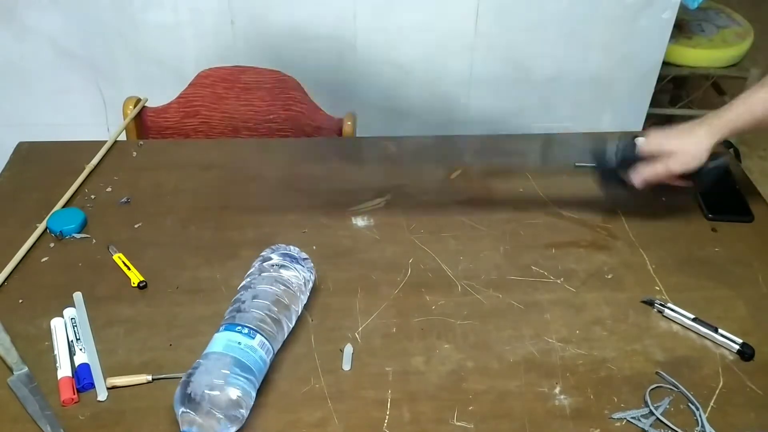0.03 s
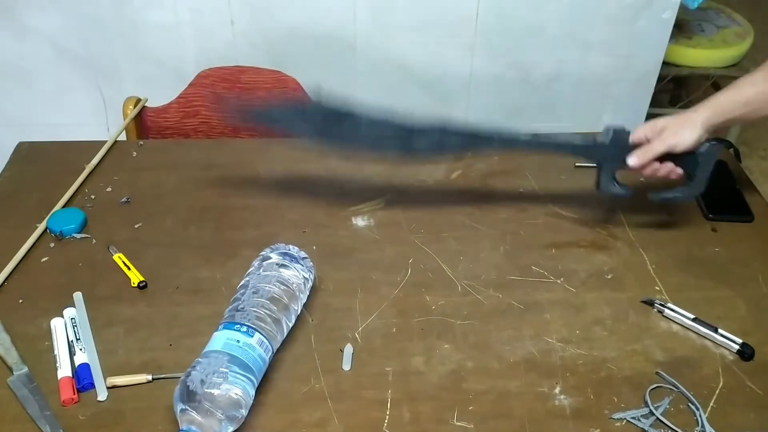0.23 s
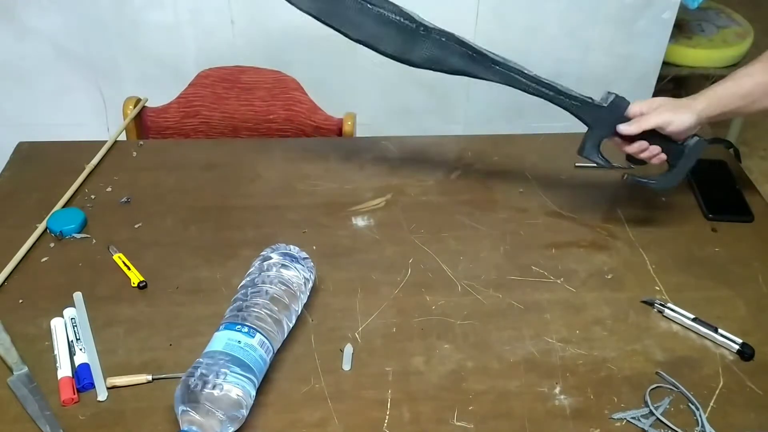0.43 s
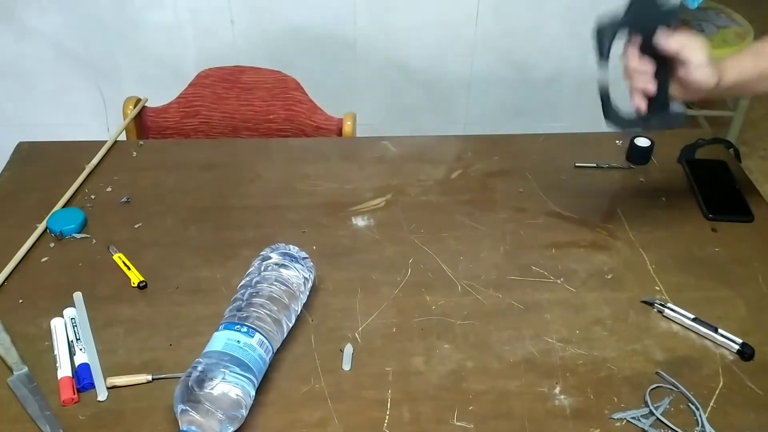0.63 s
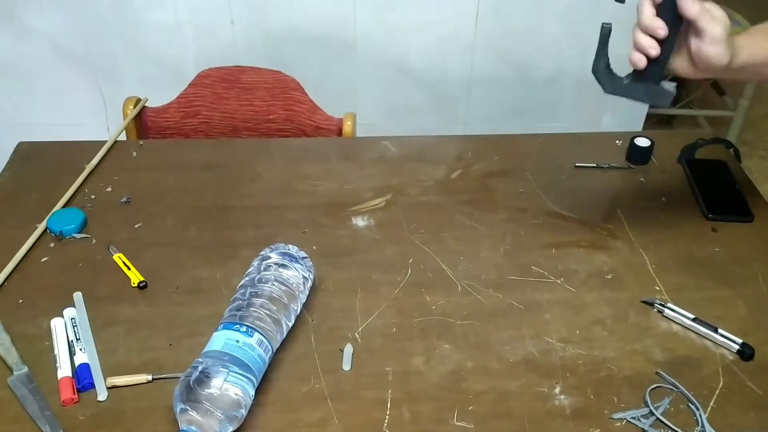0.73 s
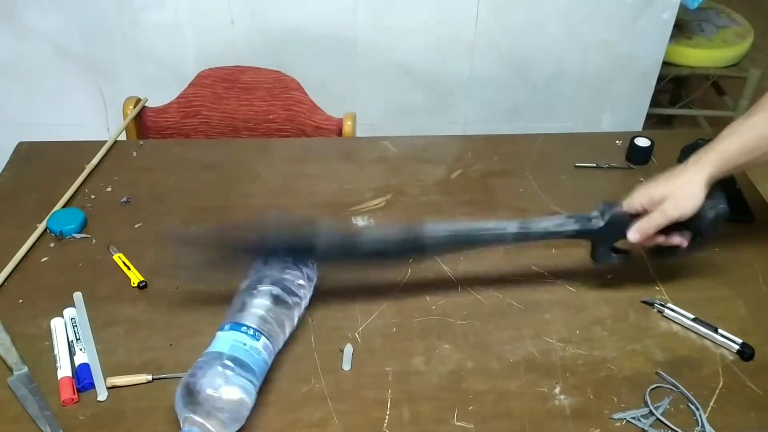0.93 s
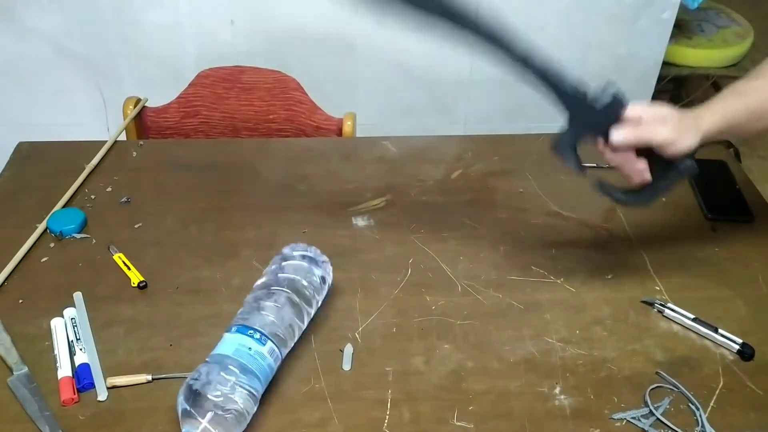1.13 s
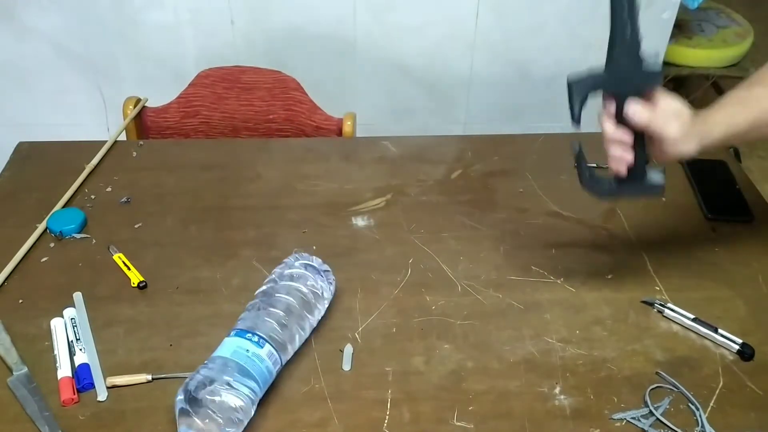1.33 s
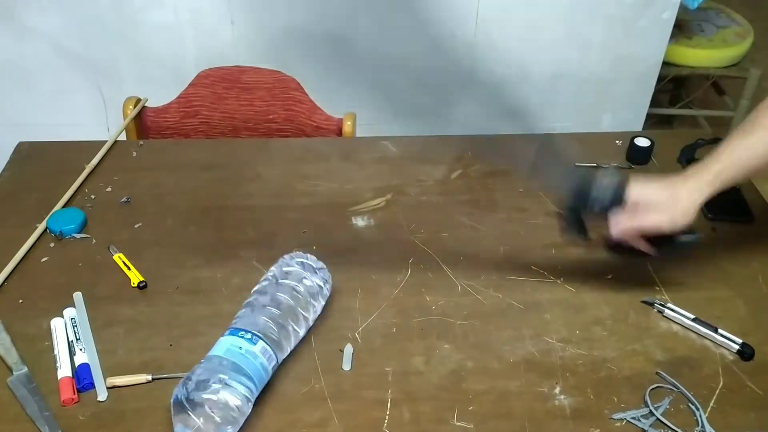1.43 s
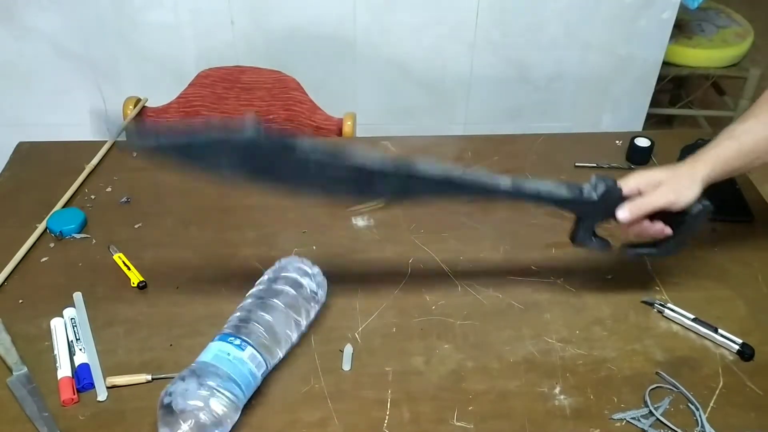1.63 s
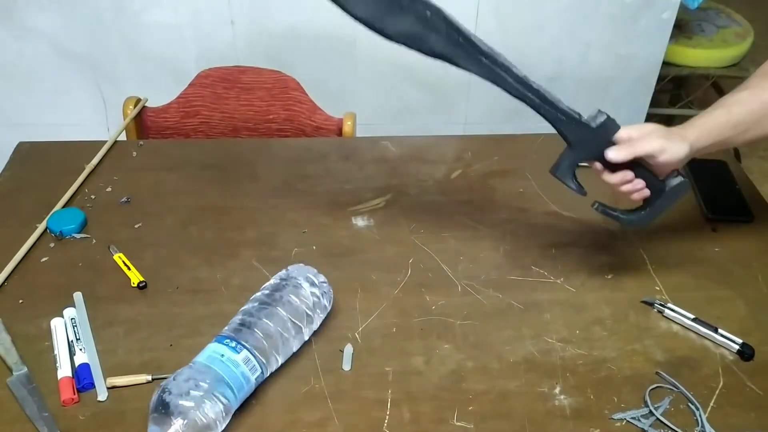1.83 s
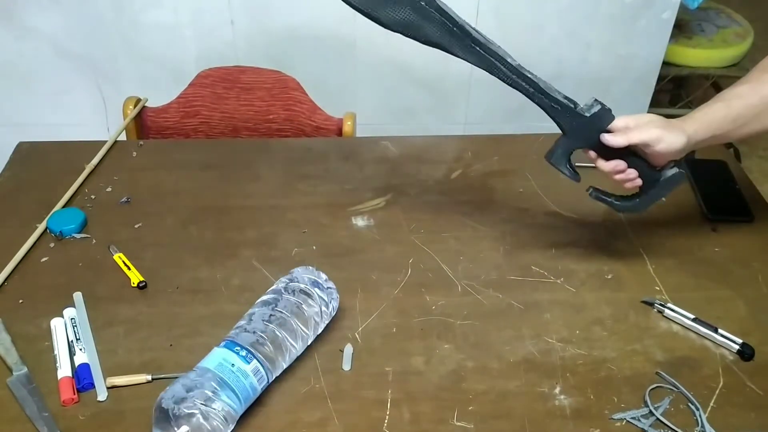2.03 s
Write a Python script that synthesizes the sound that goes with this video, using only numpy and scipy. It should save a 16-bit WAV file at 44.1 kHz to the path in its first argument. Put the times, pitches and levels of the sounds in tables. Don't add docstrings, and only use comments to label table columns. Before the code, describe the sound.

A foam sword slaps a wooden table at 0.2 s, a sharp clap with a woody boom and faint ringing of loose things. At 1.07 s it smacks a full plastic bottle, which thuds down, knocks around 1.25 s, crackles and rocks with rustling water. A soft swish leads to a harder double-touch hit at 1.62 s, knocks at 1.78 s, then fading rocking. Bare echoing room, loud blows squashed by a phone.

```python
import sys
import numpy as np
from scipy import signal
from scipy.fft import rfft, irfft, next_fast_len
from scipy.io import wavfile
from scipy.ndimage import uniform_filter1d, minimum_filter1d

SR = 44100
rng = np.random.default_rng(int(sys.argv[2]) if len(sys.argv) > 2 else 0)


def volts_from_db(level):
    exponent = np.asarray(level, float) / 20
    return 10 ** exponent


def wav_out(sig):
    wavfile.write(sys.argv[1], SR, np.round(np.clip(np.atleast_2d(sig).T, -1, 1) * 32767).astype(np.int16))


N = 92610

# (time [s], boom level [dB], slap level [dB])
TABLE_BLOWS = [
    (.2091, 5, 5),
]
# (frequency [Hz], level [dB], time to fall 60 dB [s])
THUMPED = [(60, 7, 0.42), (133, -0.5, 0.067), (149, 8.5, 0.25), (199.8, -1, 0.21), (256, 3, 0.1),
           (321, 1, 0.16), (383.3, 3.5, 0.064), (482, -7.5, 0.28), (508.2, 1, 0.24), (655.5, -4.5, 0.15),
           (743, 1, 0.24), (821, -6.5, 0.086), (1242, 2.5, 0.13), (1666, -3.5, 0.041)]
SLAP_S = .006
BLOW_WET_DB = 12.5


def unit(x):
    return x / np.sqrt(np.mean(x ** 2) + 1e-20)


def along(points, hz):
    f, v = np.transpose(points)
    return np.interp(np.log(hz + 1), np.log(f + 1), v)


def filtered(x, response):
    size = next_fast_len(x.shape[-1] + 8192)
    spectrum = rfft(x, size) * response(np.fft.rfftfreq(size, 1 / SR))
    return irfft(spectrum, size)[..., :x.shape[-1]]


def coloured_noise(colour):
    return filtered(rng.standard_normal((2, N)), lambda hz: volts_from_db(along(colour, hz)))


def pair(x):
    # (frequency [Hz], likeness [-1 to 1])
    alike = [(60, 0.98), (180, 0.98), (550, 0.71), (1650, 0.01), (4970, -0.094), (15000, 0.16)]

    def split(hz):
        turn = np.arccos(np.clip(along(alike, hz), -1, 1)) / 2
        return np.array([np.cos(turn), np.sin(turn)])

    mid, side = filtered(x, split)
    return np.array([mid + side, mid - side])


def add(out, x, s):
    at = round(s * SR)
    out[:, at:at + x.shape[1]] += x[:, :N - at]


def room(x, wet_db):
    # (frequency [Hz], time to fall 60 dB [s])
    fade_times = [(60, 0.63), (200, .55), (600, 0.51), (1500, 0.5), (4000, .45), (9000, 0.42),
                  (15000, 0.21)]
    gap_s, fill_s = 0.00098, 0.0021
    size = SR * 3 // 4
    hz, t, z = signal.stft(rng.standard_normal((2, size)), SR, nperseg=256)
    fade = volts_from_db(-60 * t / along(fade_times, hz)[:, None])
    tail = signal.istft(z * fade, SR, nperseg=256)[1][:, :size]
    since_wall = np.clip(np.arange(size) / SR - gap_s, 0, 1)
    tail = pair(tail) * (1 - np.exp(-since_wall / fill_s))
    return signal.fftconvolve(x[None], tail * volts_from_db(wet_db) / np.linalg.norm(tail[0]), axes=1)


def ring(modes, scatter_db, seconds=.5, longest_s=9):
    press_s = .0015
    t = np.arange(round(SR * seconds)) / SR
    out = np.zeros(len(t))
    for hz, db, t60 in modes:
        fade = volts_from_db(db + scatter_db * rng.standard_normal() - 60 * t / min(t60, longest_s))
        out += fade * np.sin(2 * np.pi * (hz * t + rng.random()))
    return (1 - np.exp(-t / press_s)) * out


def pulse(spectrum):
    size = 2048
    level = volts_from_db(along(spectrum, np.fft.rfftfreq(size, 1 / SR)))
    ceps = irfft(np.log(level + 1e-6))
    ceps[1:size // 2] *= 2
    ceps[size // 2 + 1:] = 0
    out = irfft(np.exp(rfft(ceps)))
    return out / np.linalg.norm(out)


def noise_puff(size, t60):
    puff = rng.standard_normal((2, size)) * volts_from_db(-60 * np.arange(size) / SR / t60)
    return puff / np.linalg.norm(puff[0])


def contacts(rows, modes, spectrum, t60, scatter_db, wet_db):
    wood_wet_db = 4
    out, push = np.zeros((2, N)), pulse(spectrum)
    for s, boom_db, noise_db in rows:
        wood = volts_from_db(boom_db - 30) * ring(modes, scatter_db, longest_s=.16)
        noise = signal.fftconvolve(noise_puff(512, t60), push[None], axes=1)
        add(out, volts_from_db(noise_db) * noise, s)
        add(out, wood[None], s)
        long_push = np.pad(push, (0, len(wood) - len(push)))
        sent = volts_from_db(wood_wet_db) * wood + volts_from_db(noise_db + wet_db) * long_push
        add(out, room(sent, 0), s)
    return out


def room_tone():
    # (frequency [Hz], level [dB])
    hush = [(15, -59), (25, -21), (59, 3), (102, -14.5), (195, -13), (911, -25.5), (1290, -29.5),
            (2280, -30.5), (16000, -35)]
    return volts_from_db(-58.5) * unit(pair(coloured_noise(hush)))


def swishes():
    # (time [s], level [dB], width [s])
    moves = [
        (.62, -57, 0.045),
        (.775, -61, .02),
        (1.065, -58, 0.035),
        (1.61, -43, 0.018),
    ]
    # (frequency [Hz], level [dB per Hz])
    air = [(500, 6), (3000, -7), (9000, -6.5), (15000, -13)]
    t = np.arange(N) / SR
    swell = sum(volts_from_db(db) * np.exp(-((t - s) / width) ** 2) for s, db, width in moves)
    return swell * unit(coloured_noise(air))


def loose():
    # (frequency [Hz], level [dB], time to fall 60 dB [s])
    singing = [(193.3, -49.5, 2.5), (201.5, -56.5, 6.5), (912, -51, 1.6), (1100, -57, .7)]
    out = np.zeros((2, N))
    add(out, ring(singing, 0, seconds=2)[None], TABLE_BLOWS[0][0])
    return out


def rocking():
    # (time [s], rumble level [dB], rustle level against the rumble [dB])
    stretches = [
        [(0.0, -38, -5.5), (0.104, -36.5, -20), (0.12, -41.5, -15.5), (0.17, -36.5, -19)],
        [(1.3, -29.5, -18), (1.442, -37.5, -11.5), (1.58, -39, -15.5)],
        [(1.86, -36.5, -3.5), (1.99, -44, -10.5), (2.016, -33.5, -16), (2.1, -42, -3.5)],
    ]
    # (frequency [Hz], width [Hz], level [dB])
    rocked = [(60, 35, 7), (155.8, 15.7, 5), (208.5, 30, 5.5), (254, 37, 7), (375, 50, -4), (490, 37, 4),
              (660, 40, -9), (722, 30, -5.5), (1168, 180, -7), (1800, 570, -16.5)]
    # (frequency [Hz], level [dB])
    rustle = [(880, -2.5), (1500, -2), (4460, -13.5), (11700, -15.5), (14900, -19), (16000, -36)]
    bumps_per_s, scatter_db, fade_s, wet_db = 220, 3, 0.066, 15.5

    def table(f):
        total = 0
        for k, (centre, width, db) in enumerate(rocked):
            drag = 1j * f * width
            total = total + (-1) ** k * volts_from_db(db) * drag / (centre * centre - f * f + drag)
        return total

    t = np.arange(N) / SR
    draw = rng.random((2, N + SR // 2))
    bumps = (draw[0] < bumps_per_s / SR) * volts_from_db(-scatter_db * np.log(draw[1] + 1e-9))
    near = filtered(bumps, table)
    rumble = unit((near + room(near, wet_db)[:, :len(near)])[:, -N:])
    hiss = unit(coloured_noise(rustle))
    out = np.zeros((2, N))
    for rows in stretches:
        s, db, under_db = np.transpose(rows)
        fade_in = np.clip((t - s[0]) / fade_s + 1, 0, 1)
        fade_out = np.clip((s[-1] - t) / fade_s + 1, 0, 1)
        mix = rumble + volts_from_db(np.interp(t, s, under_db)) * hiss
        out += fade_in * fade_out * volts_from_db(np.interp(t, s, db)) * mix
    return out


def snaps():
    # (time [s], level [dB])
    sharp = [
        (.2092, 0),
        (.2136, -4),
        (1.0750, 0),
        (1.0828, -2),
        (1.0885, -2),
        (1.2580, -9),
        (1.6318, -2),
        (1.6435, -4),
        (1.7822, -10),
    ]
    # (time [s], level [dB])
    creases = [(1.404, -26), (1.453, -21), (1.4560, -26), (1.497, -19), (1.5860, -39), (1.5980, -35),
               (1.8775, -20), (1.9470, -35), (2.0201, -24.5), (2.0850, -33)]
    # (frequency [Hz], level [dB])
    colour = [(1500, -30), (5000, -9), (9000, -2), (13000, 0), (16500, -2)]
    near, far = np.zeros((2, N)), np.zeros(N)
    for s, db in sharp + creases:
        add(near, volts_from_db(db) * noise_puff(256, .001), s)
        far[round(s * SR)] = volts_from_db(db)
    heard = near + room(far, 0)[:, :N]
    return signal.fftconvolve(heard, pulse(colour)[None], axes=1)[:, :N]


def bottle_knocks():
    # (time [s], thud level [dB], tick level [dB])
    knocks = [(1.0800, 1.5, -9), (1.2350, -21, -37.5), (1.2440, -10.5, -4), (1.2576, -8.5, -2),
              (1.4030, -20.5, -38), (1.4507, -42, -24), (1.5050, -16, -44), (1.5709, -18, -20.5),
              (1.5850, -18.5, -46), (1.6293, 1, 10), (1.7700, -10, -9), (1.7820, -13, -5),
              (1.8500, -45, -34), (1.8780, -20.5, -37), (2.0059, -20.5, -52), (2.0189, -17, -54),
              (2.0683, -31, -38)]
    # (frequency [Hz], level [dB])
    tick = [(300, 7), (2000, -1), (6000, -3.5), (12000, -5.5), (16500, -13)]
    return contacts(knocks, THUMPED, tick, .0012, scatter_db=2, wet_db=6.5)


def bottle_blows():
    # (time [s], boom level [dB], slap level [dB])
    blows = [
        (1.0746, -26.5, 11),
        (1.6213, 1, 6),
        (1.6300, -10.5, 8),
    ]
    # (frequency [Hz], level [dB])
    smack = [(60, -39.5), (150, -3.5), (400, -6.5), (900, -6), (1500, -4.5), (10300, -8.5), (14800, -9.5),
             (16500, -41)]
    return contacts(blows, THUMPED, smack, SLAP_S, scatter_db=2, wet_db=BLOW_WET_DB)


def table_blow():
    # (frequency [Hz], level [dB], time to fall 60 dB [s])
    slapped = [(71, 1.5, 0.19), (137.4, -2.5, 0.15), (205.6, 4.5, 0.32), (281.7, 8, 0.26), (306.5, 7, 0.06),
               (380, 6.5, .12), (471, 13, 0.075), (603, 6, 0.073), (708, 8, 0.12), (729, 11.5, 0.088),
               (799, 8.5, .08), (881, 9.5, 0.064), (1041, 8, 0.087), (1230, 1.5, 0.096)]
    # (frequency [Hz], level [dB per Hz])
    slap = [(100, -25.5), (300, -4), (800, -1.5), (1300, -3.5), (2200, -11), (7000, -12.5), (14800, -12),
            (16500, -30)]
    return contacts(TABLE_BLOWS, slapped, slap, SLAP_S, scatter_db=0, wet_db=BLOW_WET_DB)


def scene():
    background = room_tone() + swishes() + loose() + rocking()
    return background + snaps() + bottle_knocks() + bottle_blows() + table_blow()


def roll_off(x):
    return signal.sosfilt(signal.butter(12, 16800, fs=SR, output="sos"), x)


def record(dry):
    # (frequency [Hz], left over right [dB])
    lean = [(60, 1.5), (240, 1.5), (950, 0.0), (3770, -1), (15000, 4)]
    low_cut_hz, top_hz, top_soft_hz, over_top_db = 36, 15650, 100, -45
    ceiling_db, release_db_per_s, ahead_s = 0, 259.5, .0007

    def ports(hz):
        top = volts_from_db(over_top_db * (1 + np.tanh((hz - top_hz) / top_soft_hz)) / 2)
        low_cut = (1j * hz / (low_cut_hz + 1j * hz)) ** 4
        return top * low_cut * volts_from_db(np.outer([.5, -.5], along(lean, hz)))

    x = filtered(dry, ports)
    ahead = max(round(ahead_s * SR), 1)
    need_db = np.minimum(0, ceiling_db - 20 * np.log10(np.abs(x).max(0) + 1e-9))
    ramp_db = release_db_per_s * np.arange(N) / SR
    lowest_db = minimum_filter1d(need_db, 2 * ahead + 1)
    gain_db = np.minimum.accumulate(lowest_db - ramp_db) + ramp_db
    mix = x * volts_from_db(uniform_filter1d(np.minimum(gain_db, 0), ahead))
    return roll_off(mix)


dry = scene()
out = record(dry)
wav_out(out)
```